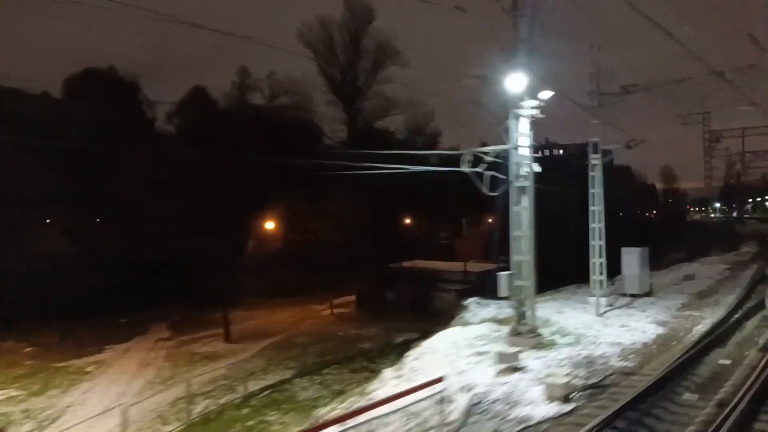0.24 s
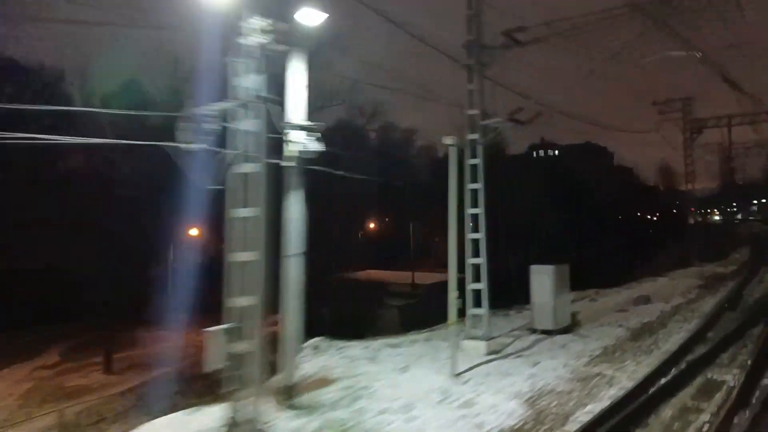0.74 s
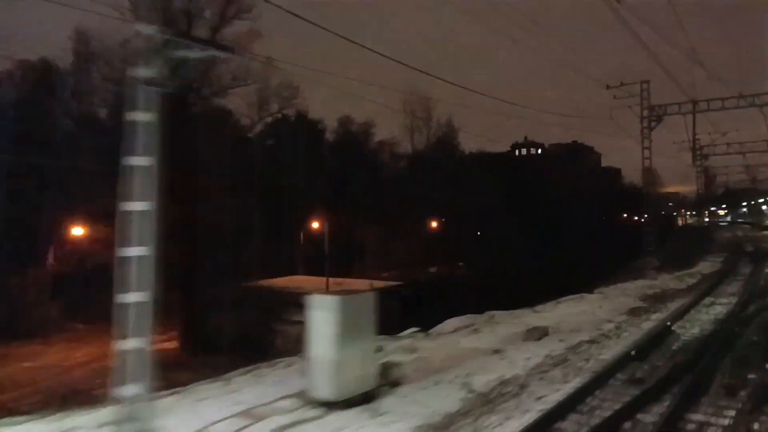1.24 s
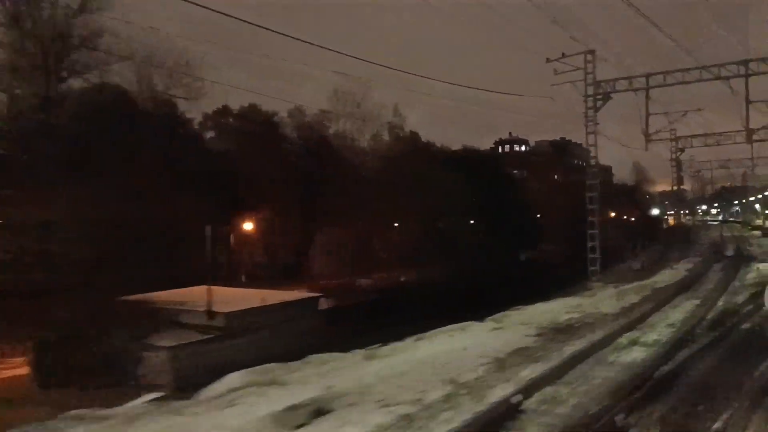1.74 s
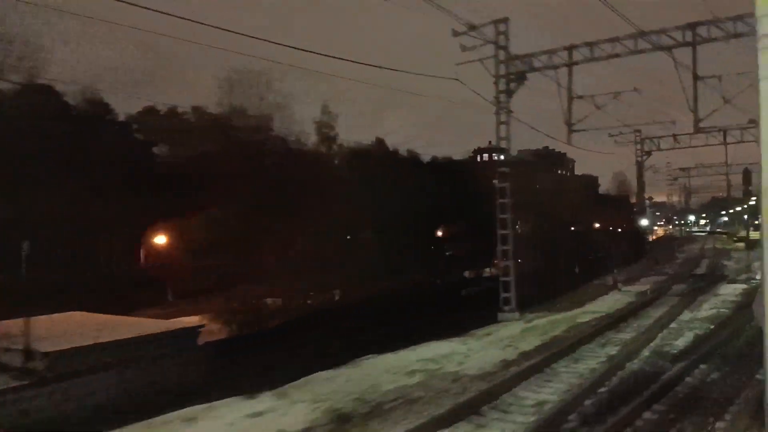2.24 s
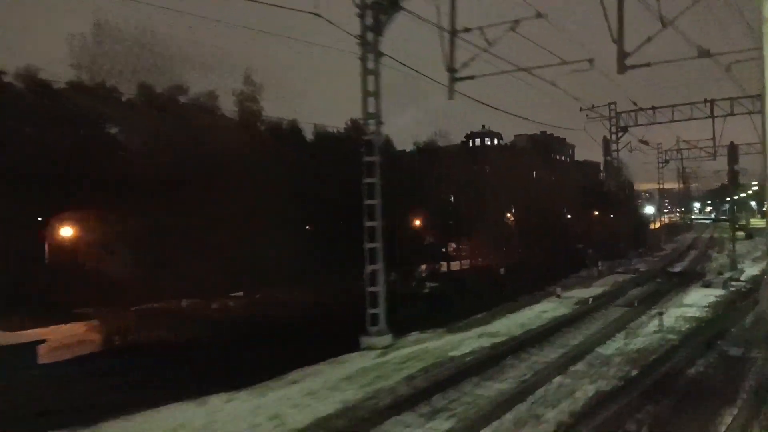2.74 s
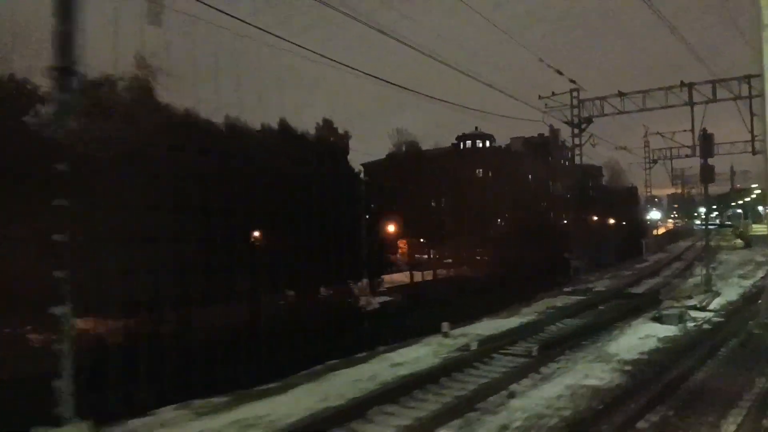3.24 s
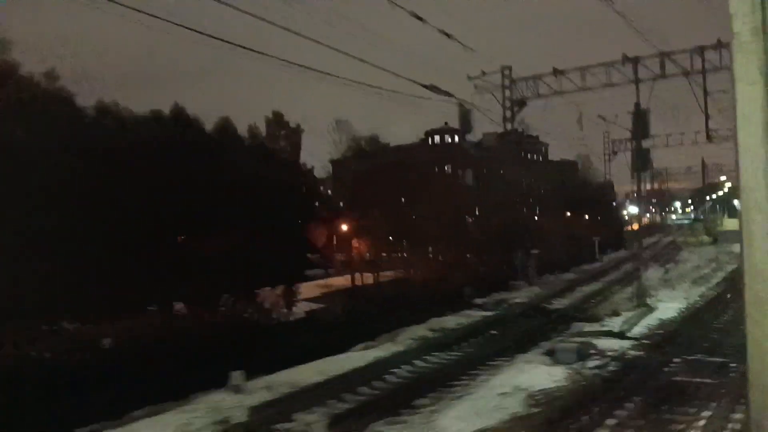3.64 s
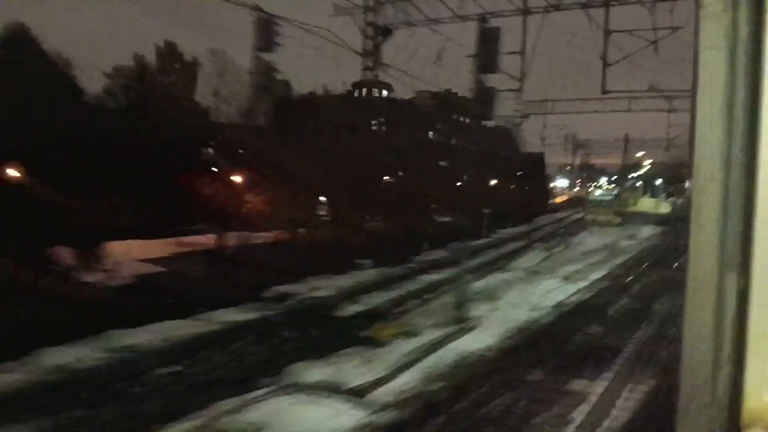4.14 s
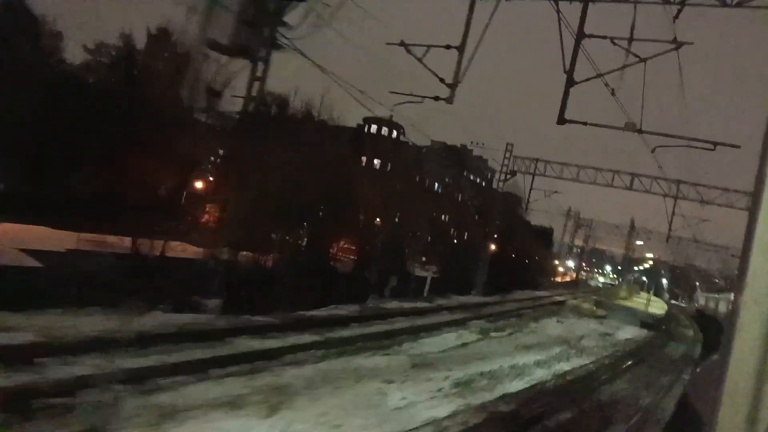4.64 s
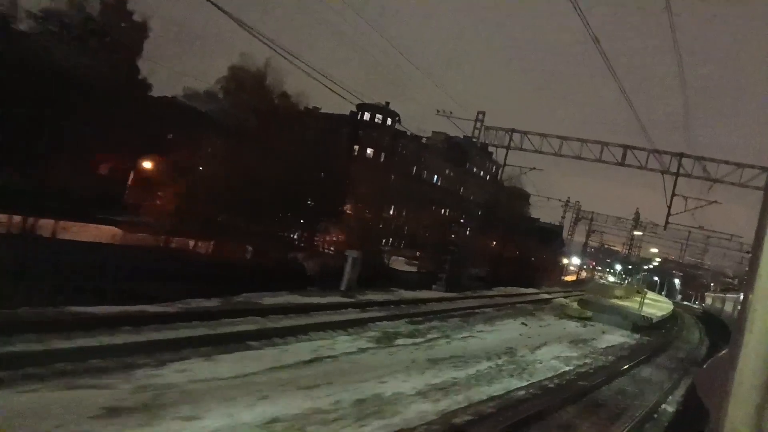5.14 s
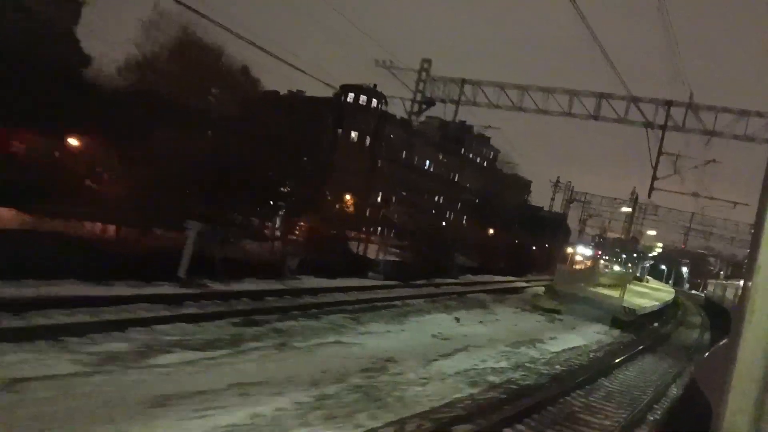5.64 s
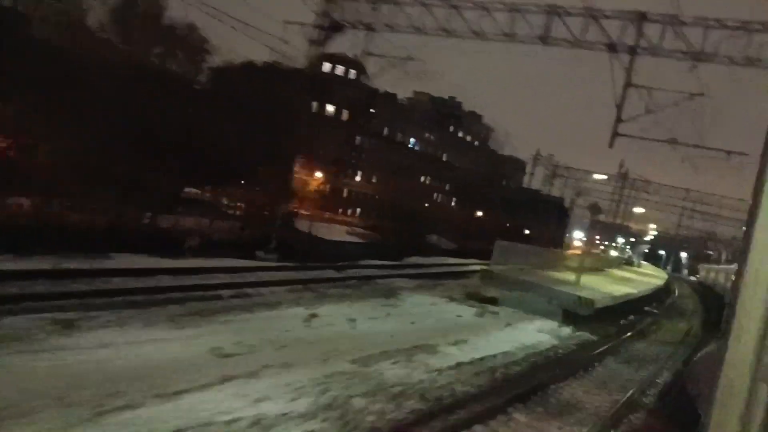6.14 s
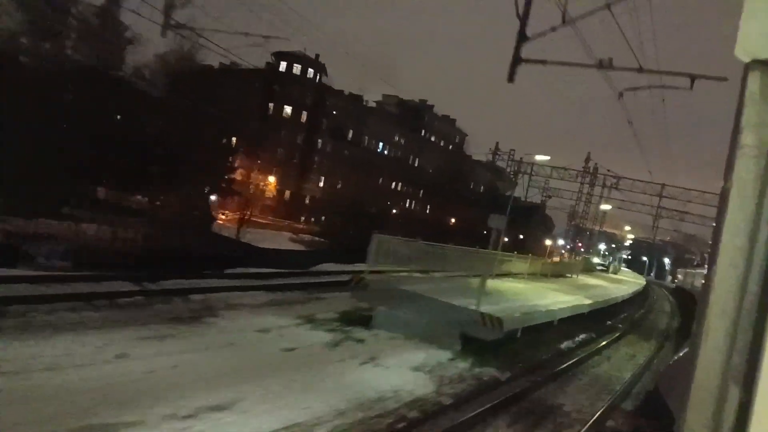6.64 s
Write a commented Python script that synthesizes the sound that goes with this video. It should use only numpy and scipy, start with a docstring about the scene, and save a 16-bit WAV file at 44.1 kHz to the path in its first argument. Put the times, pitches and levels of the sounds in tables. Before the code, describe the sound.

Loud, close draught dominates: bassy thumps, fluttering and snapping slaps, strong on the left and softer on the right, briefly ducking the train behind. The train is a continuous grainy rush of wheels on rails, with metallic resonances and a weak mid-pitched motor tone in the first half. Near the end, faint high whistling and scraping rise as the track curves. Outdoor air at a carriage window, handheld phone, no echo.

```python
"""Electric train at an open window

An electric train rolls along at night, heard by a phone at an open window. The draught, built of random
pressure pulses, buffets the left microphone port hard and the right one lightly. Filtered noise makes the
roar of wheels and rails and the air hiss, and a wavering sine makes a faint motor whine. Towards the end
a wheel flange starts to squeal on a curve: sines inside bands of flickering noise."""
import sys
import numpy as np
from scipy import signal
from scipy.fft import rfft, irfft, next_fast_len
from scipy.io import wavfile
from scipy.ndimage import uniform_filter1d

SR = 44100
rng = np.random.default_rng(int(sys.argv[2]) if len(sys.argv) > 2 else 0)


def dump(signal):
    """Clip the signal to [-1, 1] and save it as 16-bit WAV at the path in sys.argv[1]."""
    limited = np.clip(np.atleast_2d(signal).T, -1, 1)
    pcm = np.round(limited * 32767).astype(np.int16)
    wavfile.write(sys.argv[1], SR, pcm)


N = 303433
PORT_LAG = 19  # samples by which sound reaches the right port after the left

# Wheel and rail resonances. Each row: centre in Hz, width in Hz, left boost in dB, right boost in dB.
WHEEL_MODES = [(1579, 270, 5, 8), (2087, 360, 0.5, 6.5), (2730, 150, -2.5, 2), (3595, 200, 5, 1),
               (4354, 270, 5.5, -1), (5050, 220, 3.5, 2.5)]


def undb(db):
    """Amplitude ratio from decibels, by the definition of level."""
    return 10 ** (np.asarray(db) / 20)


def unit(x):
    """Normalization to a root-mean-square value of 1."""
    return x / np.sqrt(np.mean(x ** 2))


def noise():
    """White noise: equal mean power at every frequency."""
    return rng.standard_normal(N)


def curves(table):
    """Linear interpolation in time of each column after the first, which holds seconds."""
    s, *columns = np.transpose(table)
    return [np.interp(np.arange(N) / SR, s, column) for column in columns]


def bumps(rows, rise_s, fall):
    """Superposition of one pulse per (seconds, dB) row, with a Gaussian rise up to its time."""
    t = np.arange(0, N / SR, .002)
    rows = np.array(rows)
    late = t - rows[:, :1]
    pulses = np.exp(-np.where(late < 0, (late / rise_s) ** 2, fall(late)))
    return np.interp(np.arange(N) / SR, t, rows[:, 1] @ pulses)


def walk(rate):
    """Random modulation: levels held for 1 / rate seconds, smoothed twice, rms 1."""
    k = int(SR / rate)
    steps = np.repeat(rng.standard_normal(N // k + 1), k)
    return unit(uniform_filter1d(uniform_filter1d(steps, k), k)[:N])


def colour(x, points, modes=()):
    """Zero-phase spectral shaping through (Hz, dB) points and (Hz, width, dB) resonances."""
    size = next_fast_len(N)
    hz = np.arange(size // 2 + 1) * SR / size + 1  # 1 Hz up, so that the logarithm exists
    point_hz, point_db = np.array(points).T
    db = np.interp(np.log(hz), np.log(point_hz), point_db)
    db = db + sum(gain * np.exp(-2 * ((hz - f) / width) ** 2) for f, width, gain in modes)
    return irfft(rfft(x, size) * undb(db), size)[:N]


def band(x, lo_hz, hi_hz):
    """Band-pass filtering with a maximally flat response."""
    return signal.sosfilt(signal.butter(2, [lo_hz, hi_hz], "band", fs=SR, output="sos"), x)


def tone(hz, wobble_hz, flicker_db):
    """Frequency and amplitude modulation of a sine, rms 1 before the flicker."""
    phase = 2 * np.pi * np.cumsum(hz + wobble_hz * walk(20)) / SR
    return np.sqrt(2) * undb(flicker_db * walk(33)) * np.sin(phase)


def singing(hz, width_hz, drift_hz):
    """Quadrature modulation: slow noise on a wandering carrier gives a thin, drifting band."""
    k = int(SR / width_hz)
    phase = 2 * np.pi * np.cumsum(hz + drift_hz * walk(6)) / SR
    return unit(sum(uniform_filter1d(uniform_filter1d(noise(), k), k) * f(phase) for f in (np.sin, np.cos)))


def eddies(points, steady_s, evenness, per_s):
    """Turbulence as shot noise: scattered pressure pulses of uneven size, their slow swell evened out."""
    pulses = (rng.random(N) < per_s / SR) * noise()
    x = unit(colour(pulses, points))
    k = int(steady_s * SR)
    swell = uniform_filter1d(uniform_filter1d(x ** 2, k), k) + 0.019
    return unit(x / swell ** (evenness / 2))


def buffeting(dip_db):
    """Powers add: swells of three eddy sizes, all with one law for the rise and another for the fall."""
    # Left-port wind between buffets. Each row: time in seconds, level in dB before the shares and dips.
    lulls = [(0, -17.5), (.5, -24), (.9, -18.5), (1.3, -25), (1.7, -24), (2.1, -29), (2.5, -19.5),
             (2.9, -28), (3.3, -20), (3.9, -23), (4.3, -19.5), (4.7, -20.5), (5.1, -22.5), (5.5, -21.5),
             (5.9, -22.5), (6.3, -17.5), (6.88, -14.5)]
    # Level offsets in dB of the large, middling and small eddies in the lulls, one per row.
    lull_shares = [
        [-1],
        [-2.5],
        [-9.5],
    ]
    # Left-port buffets. Each row: peak time in seconds, length in seconds, level in dB,
    # flutter over thud in dB, rustle relative to the level in dB.
    buffets = [(0.031, 0.016, -14, -6, -19), (0.109, 0.035, -26, -16, -0.5),
               (0.167, 0.018, -12.5, -10, -8.5), (0.221, 0.01, -9.5, 0, -14),
               (0.239, 0.021, -5.5, -1, -12.5), (0.279, 0.024, -11, -4.5, -11), (0.37, 0.036, -16, 4, -14),
               (0.453, 0.05, -12.5, -2, -9.5), (0.525, 0.014, -14.5, -1, -12),
               (0.631, 0.017, -12, 11, -13.5), (0.664, 0.029, -13.5, -1, -8.5),
               (0.718, 0.012, -9.5, 20, -15), (0.755, 0.017, -11.5, -7, -16), (0.831, 0.037, -16, 14, -12),
               (0.887, 0.009, -8, 0, -5.5), (1.043, 0.019, -10, -9, -18), (1.119, 0.015, -7, -6, -12.5),
               (1.251, 0.017, -13, 6, -10), (1.327, 0.078, -13, 2, -11.5), (1.453, 0.038, -15.5, 2, -11),
               (1.492, 0.032, -15.5, 1, -6.5), (1.537, 0.011, -10, 0, -11), (1.583, 0.014, -12.5, 2, -11),
               (1.706, 0.054, -14, 3, -11.5), (1.87, 0.009, -6.5, 9, -15), (1.919, 0.01, -16, 5, -10),
               (1.965, 0.013, -16, 5, -25), (2.009, 0.015, -12.5, -10, -33),
               (2.103, 0.022, -14.5, -16, -26), (2.148, 0.013, -16.5, -11, -23),
               (2.217, 0.025, -15, -16, -18), (2.269, 0.031, -14, -2, -23), (2.357, 0.021, -7.5, -1, -16),
               (2.45, 0.097, -11.5, 4.5, -11), (2.524, 0.02, -5, -9, -11.5), (2.59, 0.019, -12, -14, -21),
               (2.632, 0.013, -8, 1, -29), (2.72, 0.036, -10.5, -6.5, -15), (2.857, 0.017, -6.5, -11, -28),
               (2.891, 0.019, -13, -2, -13), (2.929, 0.032, -10, 7, -15.5), (2.978, 0.0094, -11, 1, -23),
               (3.01, 0.013, -7.5, 2, -22), (3.067, 0.012, -7, 8, -9), (3.103, 0.033, -9, -3, -15),
               (3.163, 0.047, -13, -2, -20), (3.219, 0.013, -11, 5, -31), (3.28, 0.026, -16, 15, -6.5),
               (3.327, 0.0061, -8.5, 13, -15), (3.401, 0.033, -10, 2, -11.5), (3.452, 0.013, -10.5, 2, -11),
               (3.492, 0.023, -12.5, 4, -7), (3.53, 0.03, -11.5, 1, -15.5), (3.609, 0.01, -6.5, -2, -6.5),
               (3.661, 0.033, -9, -9, -12.5), (3.733, 0.011, -6.5, 3, -11),
               (3.809, 0.068, -12.5, -3.5, -11.5), (3.879, 0.07, -14, 4, -11),
               (3.956, 0.024, -10.5, 3, -13.5), (3.999, 0.0099, -12.5, 10, -11.5),
               (4.041, 0.034, -11.5, 3.5, -14), (4.165, 0.016, -14, 21, -7.5),
               (4.189, 0.0094, -12, -1, -12), (4.328, 0.019, -7, -1, -12), (4.378, 0.026, -9, -10, -8),
               (4.438, 0.027, -11.5, 1.5, -10.5), (4.498, 0.013, -12, -2, -5.5),
               (4.564, 0.015, -9.5, -3, -6.5), (4.614, 0.041, -12.5, -1, -13), (4.687, 0.0099, -9, 5, -8.5),
               (4.794, 0.062, -13.5, 19, -10), (4.887, 0.009, -5, 16, -23), (4.927, 0.042, -9.5, 0, -13),
               (5.049, 0.031, -11.5, -3, -12), (5.106, 0.01, -11, -1, -19), (5.172, 0.019, -9, -2, -13.5),
               (5.333, 0.016, -15.5, 10, -5), (5.402, 0.04, -14.5, -2, -8.5),
               (5.505, 0.044, -11, 0.5, -9.5), (5.603, 0.021, -7.5, 0.5, -17),
               (5.658, 0.026, -11.5, -1, -13.5), (5.721, 0.036, -9, 1, -15), (5.839, 0.011, -7.5, -7, -12),
               (5.917, 0.088, -12, 3, -9), (5.991, 0.012, -8, -21, -10.5), (6.028, 0.016, -15, -4, -18),
               (6.06, 0.016, -14, 5, -13), (6.135, 0.013, -8.5, -1, -27), (6.216, 0.038, -9.5, 21, -11.5),
               (6.276, 0.0097, -13.5, 6, -5), (6.343, 0.084, -19, 0, -1), (6.42, 0.041, -15.5, 5, -6.5),
               (6.557, 0.018, -7.5, 3, -9.5), (6.619, 0.035, -11, 5, -12), (6.67, 0.025, -7.5, 10, -13.5),
               (6.73, 0.018, -10, -4, -10.5), (6.777, 0.026, -23.5, -5, -0.5),
               (6.831, 0.027, -13, 20, -8.5)]
    # Eddy spectra, large, middling and small. Each row: frequency in Hz, level in dB.
    large = [(20, -38.5), (43, -21), (86, -3), (130, -1), (170, -6.5), (260, -28), (600, -67), (4000, -130)]
    middling = [(60, -46.5), (120, -18), (180, 0.5), (260, -4), (370, -8.5), (480, -28), (1000, -62.5),
                (4000, -120)]
    small = [(200, -40), (340, -9), (450, 1.5), (600, -3), (800, -10.5), (1100, -18.5), (1600, -30),
             (3000, -46), (8000, -110)]
    t = np.arange(N) / SR
    power = undb(2 * (curves(lulls)[0] - dip_db + np.array(lull_shares)))  # doubled dB: power
    for s, length, db, flutter_db, rustle_db in buffets:
        near = slice(max(int((s - .2) * SR), 0), int((s + .2) * SR))
        late = (t[near] - s) / length
        thud = 1 / (1 + undb(2 * flutter_db))
        share = np.array([[thud], [1 - thud], [undb(2 * rustle_db)]])
        swell = np.exp(-np.where(late < 0, 5.8 * np.abs(late) ** 2.37, 3.0 * late ** 2))
        power[:, near] += undb(2 * db) * share * swell
    sizes = (eddies(large, 0.026, 0.86, per_s=500),
             eddies(middling, 0.017, 0.86, per_s=700),
             eddies(small, 0.0085, 0.22, per_s=1000))
    return np.sum(np.sqrt(power) * sizes, axis=0)


def right_wind(level_db):
    """Turbulence at the right port: pressure pulses under a random, gusting level."""
    # Spectrum of the light wind. Each row: frequency in Hz, level in dB.
    spectrum = [(20, -49.5), (43, -17.5), (86, -4.5), (170, 2.5), (260, -2.5), (400, -5.5), (600, -20),
                (1000, -42), (2000, -60.5), (8000, -110)]
    return undb(level_db + 2.9 * walk(45)) * eddies(spectrum, 0.028, 0.93, per_s=1500)


def air_hiss(level_db):
    """Broadband flow noise: white noise shaped in frequency, its level flickering at random."""
    # Spectrum of the hiss. Each row: frequency in Hz, level in dB.
    spectrum = [(5000, -8), (7000, -5), (8200, -4.5), (9050, 2.5), (9900, -7.5), (11000, -13.5),
                (12500, -18.5), (16000, -25)]
    return undb(level_db + 1.2 * walk(40)) * unit(colour(noise(), spectrum))


def faint_hiss(gust_db):
    """Incoherent noise: independent white noise at each port, rising with the gusts."""
    base_db = -71
    return undb(base_db + .3 * gust_db + 1.5 * walk(8)) * rng.standard_normal((2, N))


def scrape(roar):
    """Independent band modulation: neighbouring quarter octaves of the roar swell and fade on their own."""
    edges = 1100 * 2 ** np.arange(0, 2.8, .25)
    swells = [undb(1.6 * walk(26)) - 1 for _ in edges[1:]]
    return roar + sum(g * band(roar, lo, hi) for g, lo, hi in zip(swells, edges, edges[1:]))


def rolling_roar():
    """Wheel on rail excites resonances: a direct wave, delayed at the right port, plus scattered sound."""
    # Direct wave against scattered sound. Each row: frequency in Hz, relative level in dB.
    direct = [(100, 0.5), (450, -0.5), (900, -16.5), (1500, -12.5), (2200, -7), (3000, 0), (4400, -13),
              (5000, -10.5), (6000, -8.5), (7000, -26)]
    # Roar spectra at the two ports. Each row: frequency in Hz, level in dB.
    left_spectrum = [(60, -13), (300, 19), (1000, -0.5), (1400, -6), (2500, -5.5), (4000, -10.5),
                     (4900, -18), (5600, -24), (7000, -31), (16000, -57.5)]
    right_spectrum = [(60, -20.5), (110, 14), (300, 5.5), (1000, 5.5), (1350, -6.5), (2500, -5.5),
                      (3600, -7.5), (3850, -10), (5500, -24.5), (7800, -23.5), (9000, -39.5),
                      (10200, -50.5), (16000, -51.5)]
    # Lowest wheel resonance ringing out. Each row: time in seconds, boost in dB before flicker.
    ringing = [(0, 5), (.8, 4), (1.4, 4.5), (2, 1), (2.5, 0.5), (3.5, -2), (5, 0), (6, 0), (6.88, 3)]
    wave = colour(noise(), direct)
    hz, width, *gains = np.transpose(WHEEL_MODES)
    ring_db = curves(ringing)[0] + 1.2 * walk(16)
    ports = []
    for points, gain, lag in zip((left_spectrum, right_spectrum), gains, (0, PORT_LAG)):
        roar = colour(np.roll(wave, lag) + noise(), points, zip(hz, width, gain))
        roar = roar / np.std(band(roar, 931, 3800))
        ring = band(roar, hz[0] - 190, hz[0] + 190)
        ports.append(roar + (undb(ring_db) - 1) * ring)
    rattle = undb(.8 * walk(30) + 1.5 * walk(140))
    return rattle * undb([[1.5], [.1]]) * scrape(np.array(ports))


def wheel_singing():
    """Lightly damped resonance: the four lowest wheel modes sing in short, thin, wandering patches."""
    hz = np.transpose(WHEEL_MODES)[0]
    mode_db = (1.0, 0.5, -1.0, -2.0)
    patches = sum(undb(db + 3.2 * walk(14)) * singing(f, 110., 45.) for f, db in zip(hz, mode_db))
    return undb(-18.5) * np.array([patches, np.roll(patches, PORT_LAG)])


def motor_whine():
    """Tonal radiation: one sine near 708 Hz that wavers in pitch and level, alike at both ports."""
    # Motor whine. Each row: time in seconds, level in dB before the rolling level.
    whine = [(0, -17), (.8, -18), (1.2, -5.5), (2.2, -10.5), (2.8, -5), (3.2, -7), (3.6, -17), (4, -3),
             (4.4, -18.5), (6.88, -29)]
    return undb(curves(whine)[0]) * tone(708, wobble_hz=5.07, flicker_db=3.3)


def slaps():
    """A pressure pulse of either sign with a fast-damped snap and a fizz, plus a brief crack of overload."""
    # Sharp slaps of air on the left port. Each row: start in seconds, pulse level in dB, then the
    # snap and the overload crack relative to the pulse in dB, all before the layer gains below.
    slap_rows = [(0.22, -18, -14, -49), (0.237, -15.5, -5.5, -26), (0.423, -19.5, -23, -41),
                 (0.624, -25.5, -11, -39), (0.661, -23, -15, -42), (0.884, -23, -15, -45),
                 (1.115, -24, -11, -39), (1.355, -25, -26, -46), (1.535, -30, -19, -42),
                 (2.099, -17, -12, -40), (2.353, -18.5, -15, -28), (2.399, -10.5, -28, -36),
                 (2.465, -15, -29, -44), (2.496, -4.5, -8, -33), (2.516, -16, -13, -45),
                 (2.633, -20, -8, -36), (2.711, -12, -30, -37), (2.853, -18, -9, -36),
                 (2.928, -19, -16, -36), (3.003, -18, 1, -40), (3.066, -16, -3, -35),
                 (3.272, -18.5, -20, -37), (3.405, -14.5, -14, -46), (3.48, -16, -15, -44),
                 (3.607, -20.5, -14, -36), (3.652, -12.5, -13, -46), (3.683, -23, -17, -45),
                 (3.734, -27, -25, -38), (3.785, -11.5, -20, -44), (3.806, -7.5, -15, -33),
                 (4.154, -28, -26, -44), (4.325, -15, -10, -30), (4.368, -8.5, -8, -48),
                 (4.444, -18, -11, -40), (4.489, -21, -21, -33), (4.564, -17.5, -13, -41),
                 (4.642, -11, -26, -38), (4.686, -20.5, -20, -38), (4.794, -24.5, -18, -37),
                 (4.882, -16, -19, -36), (4.909, -16, -22, -40), (5.043, -19, -8, -32),
                 (5.165, -27.5, -14, -36), (5.492, -18.5, -18, -38), (5.515, -8.5, -11, -40),
                 (5.594, -12.5, -23, -36), (5.888, -15, -13, -40), (5.936, -12.5, -14, -43),
                 (5.993, -24.5, -18, -40), (6.352, -22, -26, -36), (6.414, -11.5, -23, -35),
                 (6.461, -24, -16, -32), (6.483, -11.5, -33, -38), (6.496, -23, -21, -28),
                 (6.542, -20, 1, -38), (6.564, -14.5, -7, -44), (6.608, -10.5, -6, -46),
                 (6.613, -22.5, -14, -33), (6.629, -15.5, -3, -33), (6.66, -8.5, -9, -33),
                 (6.671, -16.5, 3, -33), (6.723, -29, -10, -33), (6.823, -10.5, -8, -40),
                 (6.84, -9.5, -8, -48), (6.855, -15.5, -9, -48)]
    # Spectra of the pulse, the edge of the snap and the overload crack.
    # Each row: frequency in Hz, level in dB.
    body_spectrum = [(100, -3.5), (350, 11.5), (800, 1), (1400, -15.5), (2500, -35), (8000, -87.5)]
    edge_spectrum = [(300, -13.5), (700, 0.5), (1300, 1), (2200, -10.5), (4000, -26), (9000, -48)]
    crack_spectrum = [(800, -21), (2000, 0.5), (5000, -4.5), (10000, -11), (16000, -16)]
    rise_s = 0.002967
    snap_hz, spread_oct, decay_s = 640, 0.46, 0.0011  # middle pitch, pitch spread, decay at that pitch
    marks, snap = np.zeros((3, N)), np.zeros(N)  # marks: one impulse train per layer
    chance = rng.standard_normal((len(slap_rows), 2))
    t = np.arange(600) / SR
    for (s, db, snap_db, crack_db), (sign, pitch) in zip(slap_rows, chance):
        at = int((s + rise_s) * SR)
        marks[:, at] = np.sign(sign) * undb(db + np.array([0, snap_db, crack_db]))
        hz = snap_hz * 2 ** (spread_oct * np.clip(pitch, -1.5, 1.5))
        envelope = t * hz * np.exp(-t / decay_s * hz / snap_hz)  # higher snaps die sooner
        snap[at - 30:at + 570] += marks[1, at] * envelope * np.sin(2 * np.pi * hz * t)
    fizz_level = np.roll(np.convolve(marks[1], np.exp(-t / 0.0044))[:N], -40)
    fizz = band(fizz_level * unit(band(noise(), 530, 1300)), 600, 2600)
    body = undb(28.0) * colour(marks[0], body_spectrum)
    edge = undb(24.0) * colour(marks[1], edge_spectrum)
    crack = undb(20.0) * colour(marks[2], crack_spectrum)
    return body + undb(13.0) * snap + edge + undb(-4) * fizz + crack


def squeal():
    """Stick-slip of a wheel flange: a thin whistle and a cluster of tones inside two bands of scraping."""
    # Flange squeal. Each row: time in seconds, whistle, lower scrape and upper scrape levels in dB,
    # before the onset and the port levels.
    flange = [(4.6, -63, -56, -68), (5.2, -59.5, -61, -73), (5.45, -59, -50, -68), (5.65, -56, -46, -63),
              (5.8, -57, -48, -60), (5.95, -60, -46, -61), (6.1, -58, -45, -59), (6.2, -50, -47, -52),
              (6.26, -51, -51, -63), (6.32, -48, -47, -52), (6.38, -49, -50, -56), (6.46, -47, -44, -54),
              (6.58, -47.5, -52, -53), (6.7, -49, -45, -50), (6.8, -44.5, -42, -43), (6.88, -50, -49, -46)]
    # Cluster tones. Each row: frequency in Hz, level relative to the upper scrape in dB.
    cluster_tones = [(5865, -12), (6075, -5), (6180, -6)]
    whistle_db, lower_db, upper_db = curves(flange)
    onset = np.clip((np.arange(N) / SR - 4.4) / 0.86, 0, 1)  # grows from 4.4 s over 0.86 s
    stick_slip = undb(2.5 * walk(90))

    def scraping(lo_hz, hi_hz):
        """Band-limited friction noise, independent at each port, under one shared flicker."""
        return np.array([unit(stick_slip * band(band(noise(), lo_hz, hi_hz), lo_hz, hi_hz)) for _ in range(2)])

    whistle = undb(whistle_db) * tone(4435, wobble_hz=1.2, flicker_db=.8)
    cluster = sum(undb(db) * tone(hz, wobble_hz=6., flicker_db=3.0) for hz, db in cluster_tones)
    lower = undb(lower_db) * scraping(4120, 4670) + np.array([whistle, np.roll(whistle, PORT_LAG)])
    upper = undb(upper_db) * (scraping(5700, 6300) + np.array([cluster, np.roll(cluster, PORT_LAG)]))
    return onset * (undb([[.1], [-11]]) * lower + undb([[.1], [-6]]) * upper)


def level_dips():
    """Attack and release: all but the buffets and slaps sinks briefly, then recovers exponentially."""
    # Dips. Each row: time of the lowest level in seconds, depth in dB.
    dip_rows = [(0.229, 8), (0.459, 3.5), (0.619, 5.5), (0.848, 2.5), (1.13, 4), (1.357, 4), (2.045, 2.5),
                (2.494, 4.5), (2.55, 3), (3.013, 6), (3.063, 3), (3.113, 5), (3.422, 4), (3.632, 4),
                (3.821, 7), (3.891, 2.5), (4.33, 2), (4.39, 5.5), (4.46, 1.5), (4.829, 4), (4.899, 3.5),
                (5.118, 5.5), (5.517, 4.5), (5.847, 2.5), (5.897, 3.5), (5.956, 4.5), (6.376, 1.5),
                (6.475, 3), (6.555, 2), (6.625, 2.5), (6.715, 4), (6.805, 3.5)]
    fall_s, recover_s = 0.019, 0.084
    return bumps(dip_rows, fall_s, lambda late: late / recover_s)


def gusts():
    """Gaussian swells of level: short gusts across the right port, which also lift the hisses."""
    # Gusts. Each row: peak time in seconds, rise in dB.
    gust_rows = [(0.239, 5.5), (0.369, 4), (0.459, 3), (1.028, 5), (1.596, 8), (2.265, 4), (2.365, 6.5),
                 (2.953, 9), (3.033, 4), (3.732, 5.5), (4.31, 9), (4.43, 0), (4.54, 6), (4.749, 5),
                 (4.839, 6), (4.989, 7), (5.517, 4), (5.697, 5), (5.917, 5), (6.066, 8), (6.306, 4.5),
                 (6.366, 5), (6.485, 3), (6.555, 3), (6.635, 5), (6.765, 4.5)]
    gust_s = 0.032
    return bumps(gust_rows, gust_s, lambda late: (late / gust_s) ** 2)


def surges():
    """Gaussian swells of level: brief surges, and a few slight sags, of the rolling sound."""
    # Surges. Each row: peak time in seconds, rise in dB.
    surge_rows = [(0.13, 3.5), (0.78, 2), (1.23, 4.5), (2.33, 2.5), (2.82, 2), (2.96, 3.5), (3.3, 1),
                  (3.58, 2.5), (3.72, 2.5), (4.1, 3), (4.27, 1.5), (4.56, 4), (4.72, 1.5), (4.85, 4),
                  (5.07, 0.5), (5.32, -1), (5.55, 2), (5.77, -0.5), (6.08, 3), (6.2, 4), (6.32, 3.5),
                  (6.42, 2)]
    surge_s = 0.023
    return bumps(surge_rows, surge_s, lambda late: (late / surge_s) ** 2)


def scene():
    """Linear superposition of the wind at each port and the train heard at both."""
    # Levels before gusts, surges and dips. Each row: time in seconds, rolling in dB,
    # right-port wind in dB, air hiss in dB.
    breeze = [(0, -42.5, -33, -66.5), (.7, -40, -33.5, -65), (1.4, -42.5, -34.5, -63.5),
              (2.3, -39.5, -28, -58.5), (3.3, -39, -29.5, -60), (4.3, -41, -30.5, -61),
              (5.1, -38, -32, -62.5), (5.8, -38.5, -29, -59), (6.4, -39, -30.5, -61.5),
              (6.6, -41.5, -31, -63), (6.88, -43.5, -33, -66)]
    dip_db, gust_db = level_dips(), gusts()
    roll_db, right_db, hiss_db = curves(breeze)
    hiss_db = hiss_db + 0.1331 * gust_db ** 2 - 0.65 * dip_db  # the hiss shares part of each dip
    wind = buffeting(dip_db)
    left = wind + slaps() + air_hiss(hiss_db)
    shared_wind = undb(-31) * np.roll(wind, PORT_LAG)  # left buffeting that also reaches the right port
    right = right_wind(right_db + gust_db - dip_db) + shared_wind
    rolling = undb(roll_db + surges()) * (rolling_roar() + wheel_singing() + motor_whine())
    return undb(-dip_db) * (faint_hiss(gust_db) + rolling + squeal()) + np.array([left, right])


def record(dry):
    """Band limiting and soft saturation: the phone sheds deep bass, rounds loud peaks and cuts the top."""
    low_cut_hz, top_hz, ceiling, fade_s = 50, 15750, .95, .004
    fade = np.clip(np.arange(N) / SR / fade_s, 0, 1)
    x = dry * fade * fade[::-1]
    x = signal.sosfilt(signal.butter(2, low_cut_hz, "high", fs=SR, output="sos"), x)
    x = x / (1 + (x / ceiling) ** 4) ** (1 / 4)
    return signal.sosfilt(signal.ellip(14, .2, 80, top_hz, fs=SR, output="sos"), x)


dry = scene()
out = record(dry)
dump(out)
```